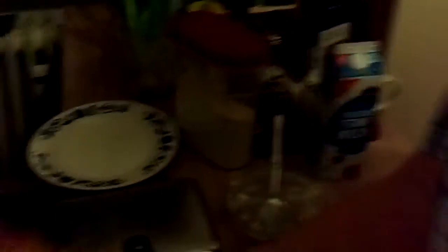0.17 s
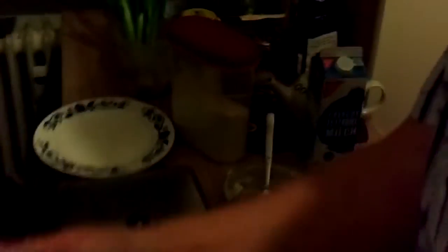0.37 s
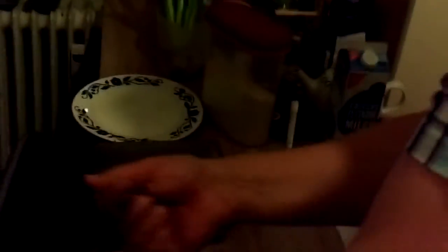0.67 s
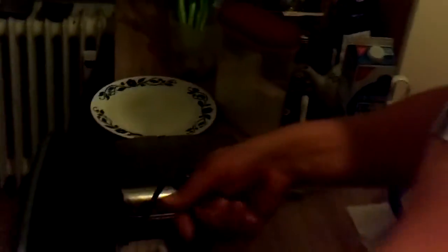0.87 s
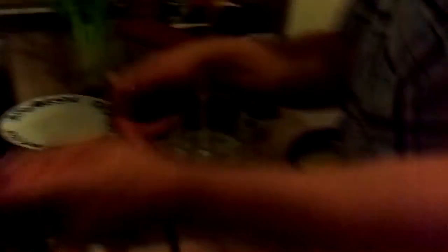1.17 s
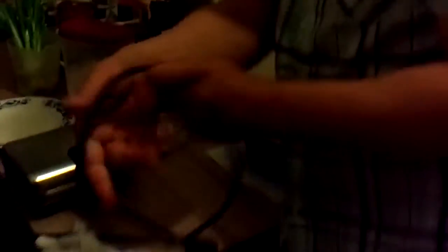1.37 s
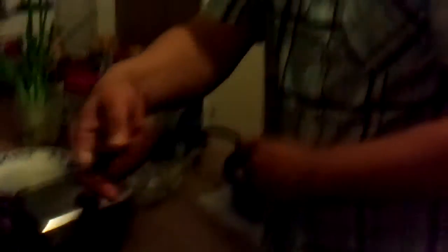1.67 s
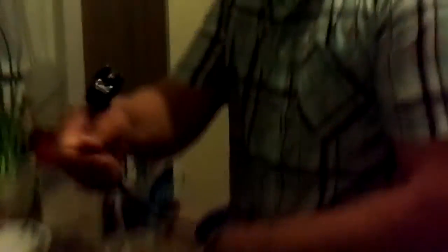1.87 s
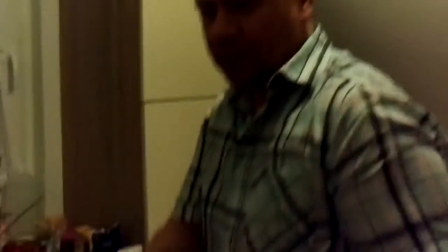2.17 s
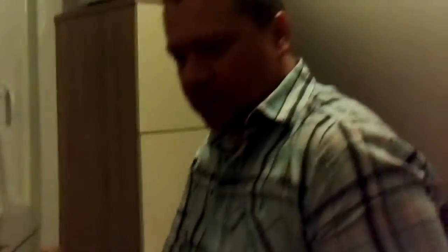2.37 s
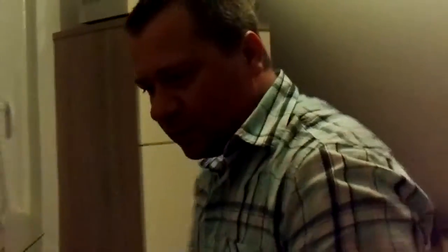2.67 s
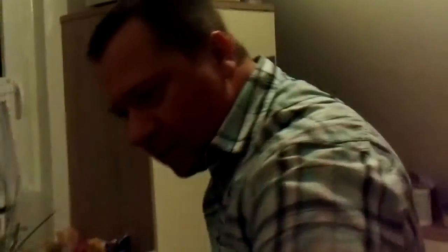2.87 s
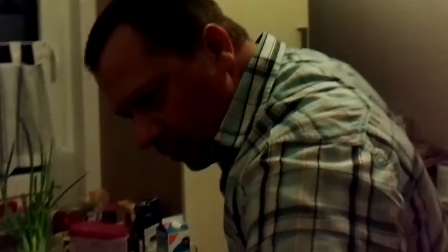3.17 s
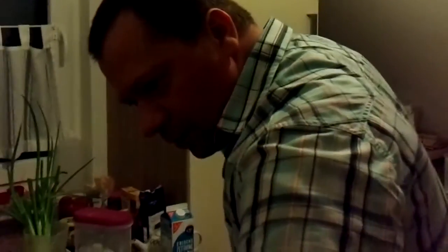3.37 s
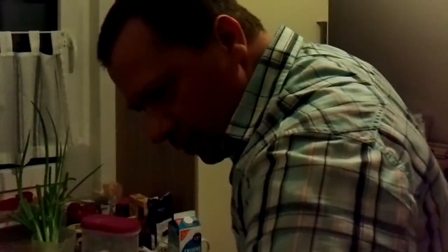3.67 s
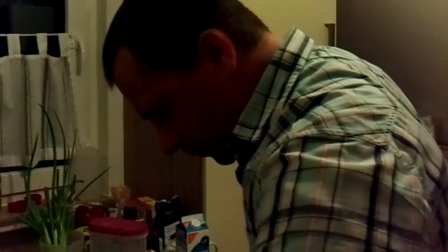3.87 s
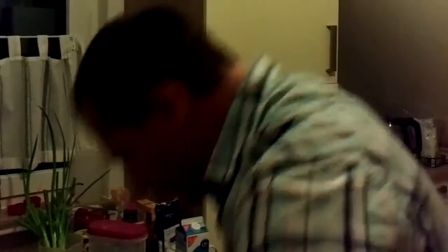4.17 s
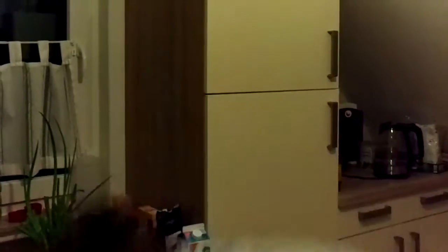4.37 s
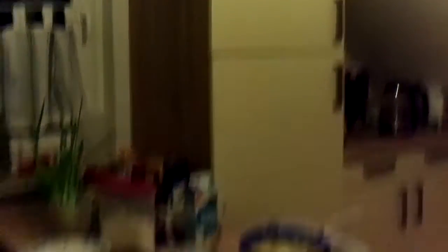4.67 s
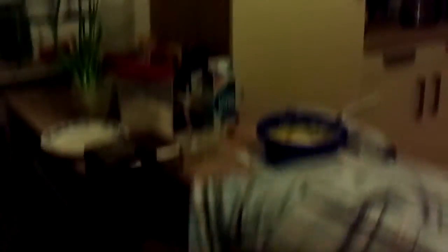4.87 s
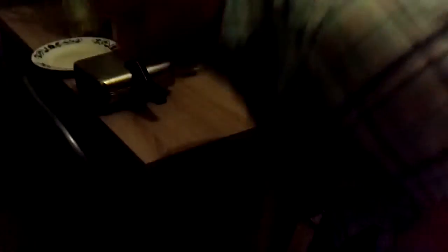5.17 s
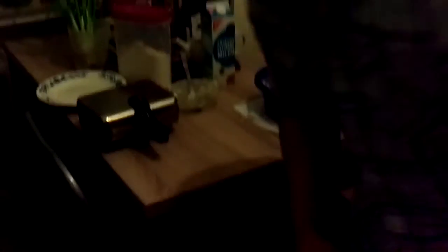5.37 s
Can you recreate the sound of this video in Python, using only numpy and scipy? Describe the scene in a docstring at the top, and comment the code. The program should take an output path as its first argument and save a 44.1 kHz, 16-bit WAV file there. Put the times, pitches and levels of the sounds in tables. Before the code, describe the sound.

Hands move a small metal appliance and its cable about a wooden kitchen table. Light knocks and a thin, high scrape lead to one sharp clack, followed by scattered small plastic clicks. A plug then snaps into a socket in a quick cluster of bright, slightly hollow clicks, and clothing rustles afterwards. The room is small, and the microphone adds a bright edge, with faint hiss and hum underneath.

```python
"""Knocks, clicks and rustling: hands move an appliance, its cable and plug about a wooden kitchen table.
Each contact is a short rough impact that excites the modes of the table, of a metal shell or hollow
socket and of hard plastic edges, then dies away in the small room. The sliding shell sings by stick-slip
friction; sleeves and cable rub between the knocks, and a few faint squeaks come near the end.
Hiss, mains hum and a thin whine lie beneath; a small microphone adds a bright resonance."""
import sys
import numpy as np
from scipy import signal
from scipy.fft import rfft, irfft
from scipy.io import wavfile

SR = 44100
rng = np.random.default_rng(int(sys.argv[2]) if len(sys.argv) > 2 else 0)


def persist_wave(psi):
    """Save psi, clipped to +-1, as 16-bit WAV."""
    counts = np.round(np.clip(psi, -1, 1) * 32767).astype(np.int16)
    wavfile.write(sys.argv[1], SR, np.atleast_2d(counts).T)


N = 242983

# appliance and cable on the table: t/s, then level/dB of snap, table, shell, plastic, edge
KNOCKS = [(0.055, -50, -47.5, -48.5, -54, -64), (0.312, -43, -55, -55, -45.5, -62),
          (0.432, -34.5, -45, -38, -40.5, -63), (0.535, -40, -51, -45.5, -59, -62),
          (.5926, -39.5, -72, -62, -50, -66), (0.709, -54, -66, -72, -64, -53),
          (0.926, -38, -52.5, -44, -44.5, -60), (0.962, -41, -69, -67, -57, -60),
          (1.0279, -18.5, -33.5, -29, -25, -26), (1.218, -58, -42.5, -44, -55, -55),
          (1.499, -45, -65, -57.5, -58, -54), (1.579, -43, -74, -70, -50, -50),
          (1.613, -35.5, -60, -59, -48, -44), (1.6537, -27.5, -54, -60, -43.5, -55),
          (1.713, -24.5, -55, -59, -41.5, -30), (1.8698, -45.5, -58, -71, -55, -46.5),
          (1.974, -32.5, -45, -36.5, -44.5, -58), (2.059, -41, -63, -68, -49, -53),
          (2.1, -42, -53.5, -54, -60, -64), (2.322, -48, -73, -71, -53, -49),
          (2.519, -33.5, -75, -59, -45.5, -56), (2.6035, -35.5, -69, -66, -48, -62),
          (2.704, -36, -59, -59, -46.5, -49), (3.09, -32, -69, -59, -46, -46),
          (3.149, -42, -46.5, -52, -48.5, -50)]
# plug and switch against the socket: t/s, then level/dB of snap, table, socket, plastic, edge
PLUG_CONTACTS = [(3.5497, -29, -62, -29, -30.5, -42), (3.5637, -33.5, -55.5, -32, -33, -58),
                 (3.743, -49, -58, -58, -58, -52), (3.9283, -44, -66, -50, -44, -52),
                 (3.9313, -16.5, -54, -28, -20.5, -29), (3.949, -19, -51.5, -48, -45, -48),
                 (4.018, -47, -63, -34.5, -55, -62), (4.057, -41, -56, -38.5, -49, -58),
                 (4.0734, -34, -65, -44, -47, -41), (4.078, -27.5, -56, -34, -32, -39),
                 (4.1026, -32, -55, -34.5, -47, -55), (4.1708, -32, -51.5, -27, -30.5, -41.5)]
# resonances of each part of a contact: f/Hz, nominal width/Hz, relative level/dB
SNAP_MODES = [(4910, 1080, 8.5), (6230, 2270, 4.5), (7900, 1900, 4)]
TABLE_MODES = [(125.5, 32, -2), (195, 35, -1), (270, 66, 1), (337.4, 23, 5.5), (426, 158, 0.5)]
SHELL_MODES = [(603, 104, -2.5), (793, 57, 0.5), (944, 72, 1.5), (1090, 63, -5), (1258, 45, 3),
               (1512, 160, -2.5)]
SOCKET_MODES = [(598, 114, -11.5), (792, 94, -7.5), (877, 78, 1), (1169, 85, -9), (1346, 140, -9.5),
                (2090, 57, -11.5), (2426, 70, -13), (2630, 58, -17), (3680, 43, -20)]
PLASTIC_MODES = [(1540, 570, -0.5), (2020, 450, 3.5), (2550, 310, 4.5), (2940, 410, 3.5), (3780, 720, -1)]
EDGE_MODES = [(7900, 2000, 33.5), (12000, 4000, 1)]
# room response by part: reverberation time/s; level/dB relative to the contact
ROOM_T60_S = {"snap": 0.3, "table": 0.39, "hollow": 0.32, "plastic": 0.26, "edge": 0.15}
ROOM_SHARE_DB = {"snap": -7, "table": -7, "hollow": -7, "plastic": -7.5, "edge": -6.5}
# clear pings: t/s, peak level/dB after the microphone, f/Hz, cycles to the peak
PINGS = [(.3155, -43, 760, 1.5), (.3155, -28, 3750, 1.5), (.437, -47, 178, 6), (.438, -36, 950, 3),
         (.927, -52, 130, 2), (1.0035, -33, 5200, 3), (1.030, -34, 790, 3), (1.031, -28, 1270, 5),
         (1.031, -4, 5300, 3), (1.224, -45, 390, 4), (1.6128, -30, 5900, 2), (1.7147, -15, 6500, 1.5),
         (2.0635, -35, 5300, 1.5), (2.5194, -26, 6100, 2), (3.0147, -38, 5400, 2), (3.0946, -17, 6100, 2),
         (3.17, -62, 135, 2.5), (3.5514, -22, 4000, 1), (3.5675, -21, 5500, 2), (3.862, -57, 3000, 4.5),
         (3.9329, -9, 4600, .5), (3.9347, -4, 6400, 1.5), (3.9372, -5, 5650, 2), (1.0305, -33, 12500, 5),
         (1.7147, -40, 11000, 3), (3.552, -32, 875, 9), (3.934, -18, 3050, 5), (3.9347, -32, 12500, 4),
         (4.079, -42, 11500, 4), (4.0817, -14, 5500, 3), (4.172, -32, 855, 9), (4.1716, -24, 1000, .5),
         (4.1716, -21, 2700, 1)]
# singing of the sliding shell: t/s, f/Hz, level/dB including the full microphone boost
SLIDE = [(.3, 5500, -64), (.36, 5480, -41), (.45, 5440, -49), (.6, 5530, -51), (.78, 5520, -62),
         (.87, 5490, -49), (.96, 5000, -48), (1.02, 5100, -50), (1.04, 5050, -90)]
# rubbing of sleeves and cable: t/s, hiss level/dB, body level/dB
RUSTLE = [(0, -38.5, -48.5), (.1, -44, -55.5), (.28, -48, -59.5), (.45, -48, -49), (.77, -52, -58.5),
          (1.0, -49, -51), (1.2, -59, -63), (1.42, -57.5, -65), (1.55, -52.5, -63), (1.89, -53, -63.5),
          (2.15, -55, -60), (2.55, -53, -63.5), (2.8, -58, -66.5), (3.1, -57.5, -65), (3.5, -63.5, -66),
          (3.92, -67, -64), (4.12, -61, -53), (4.3, -55.5, -59.5), (4.75, -41, -56.5), (4.92, -48, -53),
          (5.03, -57.5, -66), (5.51, -49, -53)]
# high, middle and low bands of the rustle: f/Hz, nominal width/Hz, relative level/dB
CLOTH_HISS = [(4340, 2870, 1.5), (6220, 2250, 3.5), (8290, 1950, -2)]
CLOTH_BODY = [(1035, 520, -2.5), (2025, 1960, -1.5), (2913, 1594, 0)]
CLOTH_RUMBLE = [(101, 22, -0.5), (192, 66, 3.5), (346, 78, 1.5), (600, 216, 2.5)]
# faint squeaks, then a last small knock at 1.5 kHz: centre t/s, greatest rms level/dB, f/Hz, duration/s
SQUEAKS = [(4.885, -61, 2610, .04), (5.015, -66, 2580, .05), (5.24, -62, 2590, .035),
           (5.475, -56, 1500, .02)]
# spectrum of the steady hiss: f/Hz, relative spectral level/dB
HISS_SPECTRUM = [(12, -28), (20, -6), (53, -6.5), (143, -10.5), (173, -19), (371, -6.5), (696, -10.5),
                 (889, -9.5), (992, -11), (1540, -15.5), (8120, -14.5), (8810, -16), (13600, -19)]
# mains hum: t/s, level/dB
HUM_LEVELS = [(0, -66), (1.1, -66), (2.6, -71), (4.3, -71), (4.6, -69), (5.51, -71)]

CONTACT_S, CONTACT_SNAP_DB, CONTACT_DB_PER_DB = 0.0051, -26.5, 0.37   # length at this snap level; slope
CONTACT_RISE = 0.22   # share of the contact length spent pressing in
ROOM_BUILD_S = 0.0029
MIC_HZ, MIC_WIDTH_HZ, MIC_BOOST_DB = 5677, 1330, 15.5


def contacts():
    """Impact excitation: each touch snaps and sounds table, plastic, edges and either shell or socket."""
    echo_clumps = amp(2.0 * drift(68))   # early echoes arrive unevenly
    times, snap_db, table_db, hollow_db, plastic_db, edge_db = np.transpose(KNOCKS + PLUG_CONTACTS)
    lengths = CONTACT_S * amp(CONTACT_DB_PER_DB * (snap_db - CONTACT_SNAP_DB))   # softer is shorter
    shell, socket = slice(len(KNOCKS)), slice(len(KNOCKS), None)
    return (struck(times, snap_db, lengths, SNAP_MODES, "snap", echo_clumps)
            + struck(times, table_db, lengths, TABLE_MODES, "table", echo_clumps)
            + struck(times[shell], hollow_db[shell], lengths[shell], SHELL_MODES, "hollow", echo_clumps)
            + struck(times[socket], hollow_db[socket], lengths[socket], SOCKET_MODES, "hollow",
                     echo_clumps)
            + struck(times, plastic_db, lengths, PLASTIC_MODES, "plastic", echo_clumps)
            + struck(times, edge_db, lengths, EDGE_MODES, "edge", echo_clumps))


def struck(times, levels_db, lengths, modes, part, echo_clumps):
    """Incoherent addition: each rough burst and its diffuse, decaying reverberation sum in power."""
    direct_power, room_feed = np.zeros(N), np.full(N, 1e-18)
    t = np.arange(SR // 30) / SR
    for onset, db, length in zip(times, levels_db, lengths):
        start = round(onset * SR)
        pressing = np.minimum(t / (CONTACT_RISE * length), 1)
        direct_power[start:start + len(t)] += amp(2 * db) * np.exp(-2 * t / length) * pressing ** 2
        room_feed[start] += amp(2 * (db + ROOM_SHARE_DB[part]))
    decay = amp(-120 / (ROOM_T60_S[part] * SR))   # power falls 60 dB per reverberation time
    build = np.exp(-1 / (ROOM_BUILD_S * SR))
    room_power = signal.lfilter([1 - build], np.convolve([1, -build], [1, -decay]), room_feed)
    envelope = np.sqrt(direct_power + room_power * echo_clumps)
    return modal_body(envelope * rng.standard_normal(N), modes)


def pings():
    """Damped vibration: a single mode swells to its peak and dies away."""
    out, t = np.zeros(N), np.arange(SR // 3) / SR
    for onset, db, hz, cycles in PINGS:
        ping = t * np.exp(-t * hz / cycles) * np.sin(2 * np.pi * hz * t)
        out[round(onset * SR):][:len(t)] += amp(db) * ping / np.abs(microphone(ping)).max()
    return out


def shell_slide(width_hz=330):
    """Stick-slip friction sustains one high mode of the metal shell as it slides over the table."""
    hz, level_db = in_time(SLIDE)
    return amp(level_db - MIC_BOOST_DB) * narrow_noise(hz, width_hz)


def rustle():
    """Friction noise: fibres rub in small uneven grains, and one grip modulates all three bands."""
    grip = amp(2.5 * drift(4.7) + 0.42 * drift(250))
    hiss_db, body_db = in_time(RUSTLE)
    rumble_db = body_db - 9 + 2.47 * drift(7.8)   # follows the body in lumps
    bands = [(hiss_db, CLOTH_HISS), (body_db, CLOTH_BODY), (rumble_db, CLOTH_RUMBLE)]
    return sum(modal_body(amp(db) * grip * rng.standard_normal(N), modes) for db, modes in bands)


def squeaks(jitter_hz=45):
    """Random frequency modulation makes short tones unsteady as they swell and fade."""
    t = np.arange(N) / SR
    centres, db, hz, length = np.transpose(SQUEAKS)[:, :, None]
    swell = np.sum(amp(db) * np.exp(-(2 * (t - centres) / length) ** 2), axis=0)
    nearest = np.argmin(np.abs(t - centres), axis=0)
    pitch = hz[nearest, 0] + jitter_hz * drift(60)
    return np.sqrt(2) * swell * np.sin(2 * np.pi * np.cumsum(pitch) / SR)


def hiss(level_db=-62):
    """Stationary noise of room and electronics, coloured by a fixed spectrum."""
    hz = np.maximum(np.fft.rfftfreq(N, 1 / SR), 1)
    knot_hz, knot_db = np.transpose(HISS_SPECTRUM)
    colour = amp(np.interp(np.log(hz), np.log(knot_hz), knot_db))
    return amp(level_db) * rms_one(irfft(rfft(rng.standard_normal(N)) * colour, N))


def hum(mains_hz=49):
    """Mains hum: a sinusoid under slow random modulation of amplitude and frequency."""
    level_db, = in_time(HUM_LEVELS)
    amplitude = np.sqrt(2) * amp(level_db + 2.6 * drift(2.8))
    hz = mains_hz + 0.39 * drift(1.2)
    return amplitude * np.sin(2 * np.pi * np.cumsum(hz) / SR)


def whine(level_db=-79):
    """Narrow-band noise of the recorder is heard as a thin tone."""
    return amp(level_db) * narrow_noise(hz=7866, width_hz=25)


def microphone(x):
    """Resonance of the sound port lifts one broad treble band."""
    return x + amp(MIC_BOOST_DB) * resonance(x, MIC_HZ, MIC_WIDTH_HZ)


def modal_body(x, modes):
    """Superposition of steep resonances, scaled so that unit noise has rms 1 after the microphone."""
    def respond(force):
        return sum((-1) ** k * amp(db) * resonance(resonance(force, hz, 1.87 * width), hz, 1.87 * width)
                   for k, (hz, width, db) in enumerate(modes))
    impulse_response = microphone(respond(signal.unit_impulse(SR // 10)))
    return respond(x) / np.linalg.norm(impulse_response)


def resonance(x, hz, width_hz):
    """Damped oscillator: a two-pole resonance with peak gain 1."""
    r = np.exp(-np.pi * width_hz / SR)
    feedback = [1, -2 * r * np.cos(2 * np.pi * hz / SR), r * r]
    return signal.lfilter(np.array([1, 0, -1]) * (1 - r * r) / 2, feedback, x)


def narrow_noise(hz, width_hz):
    """Quadrature modulation: a noise band of rms 1 around a steady or moving pitch."""
    phase = 2 * np.pi * np.cumsum(hz * np.ones(N)) / SR
    return drift(width_hz) * np.cos(phase) + drift(width_hz) * np.sin(phase)


def drift(corner_hz):
    """Random fluctuation of rms 1: noise passed twice through a one-pole low-pass."""
    r = np.exp(-2 * np.pi * corner_hz / SR)
    smoothed = signal.lfilter([1], [1, -2 * r, r * r], rng.standard_normal(N + SR // 4))
    return rms_one(smoothed[SR // 4:])


def in_time(rows):
    """Linear interpolation of each column over the times in the first."""
    times, *columns = np.transpose(rows)
    return [np.interp(np.arange(N) / SR, times, column) for column in columns]


def amp(db):
    return 10 ** (np.asarray(db) / 20)


def rms_one(x):
    return x / np.sqrt(np.mean(x ** 2) + 1e-20)


def scene():
    """Superposition: the handling sounds add in one channel."""
    return (contacts() + pings() + shell_slide() + squeaks() + rustle())[None]


def record(dry):
    """Microphone colour and background noise; saturation rounds the peaks and a low-pass cuts the top."""
    ceiling, stopband_hz = 0.85, 14100
    mixed = whine() + microphone(dry) + hiss() + hum()
    rounded = ceiling * np.tanh(mixed / ceiling)
    return signal.sosfilt(signal.cheby2(14, 40, stopband_hz, fs=SR, output="sos"), rounded)


dry = scene()
out = record(dry)
persist_wave(out)
```